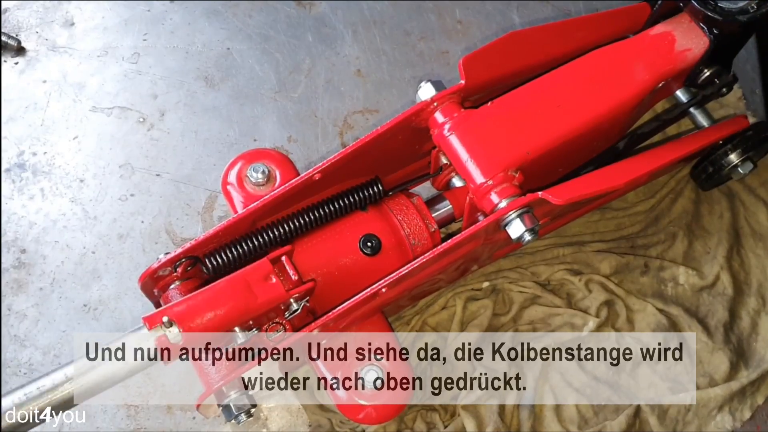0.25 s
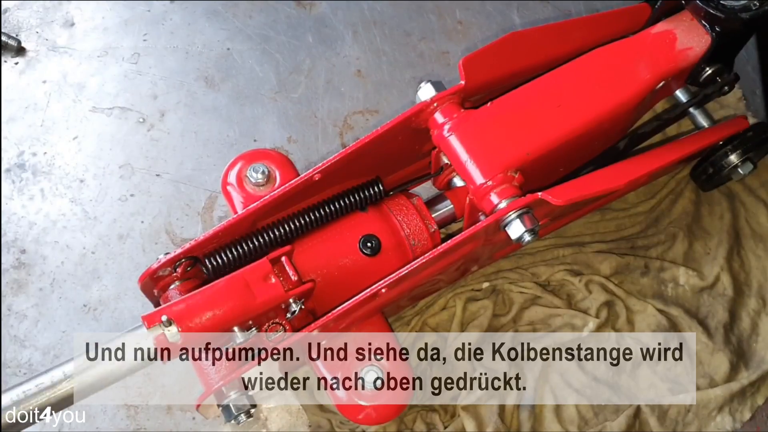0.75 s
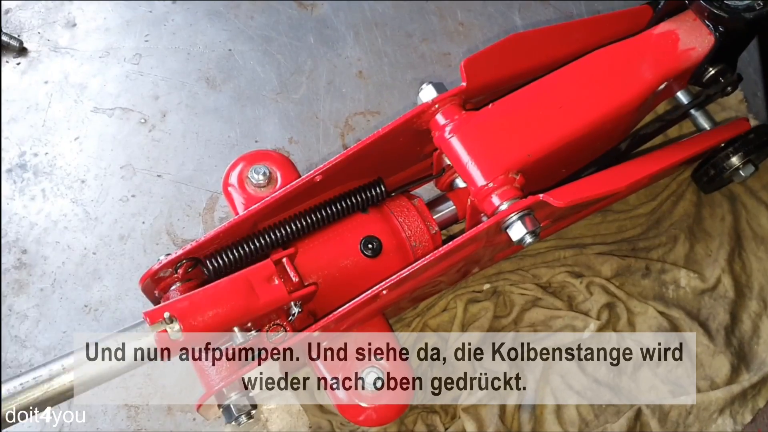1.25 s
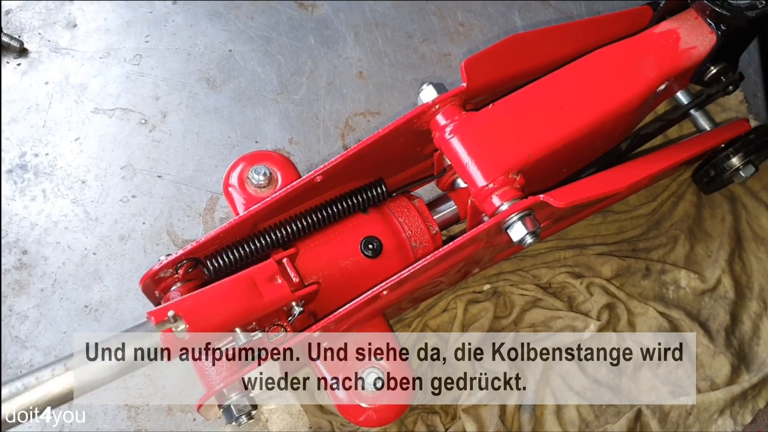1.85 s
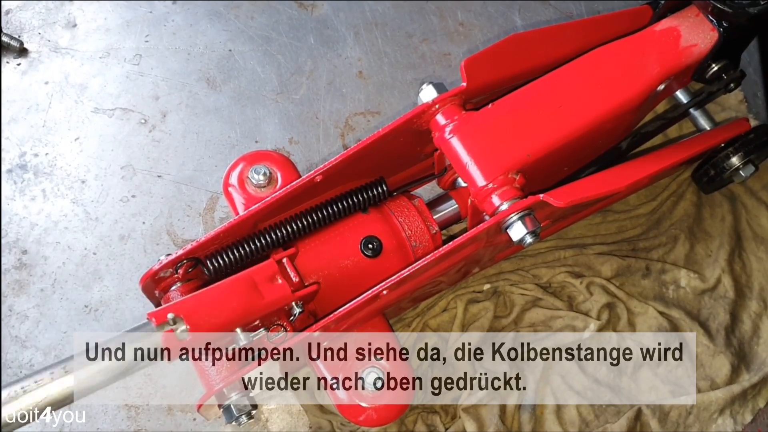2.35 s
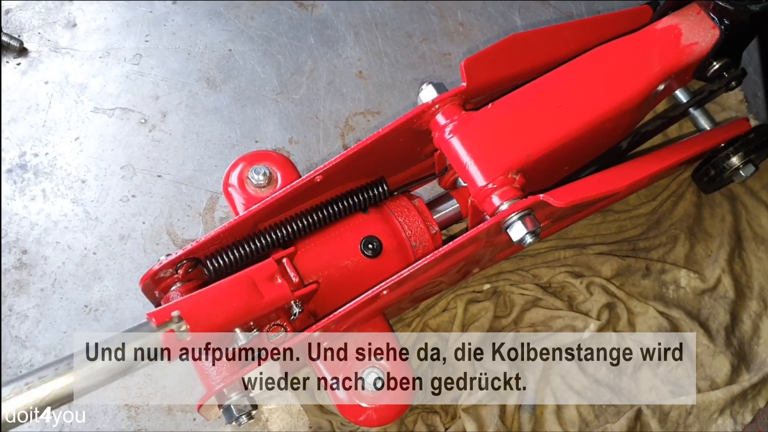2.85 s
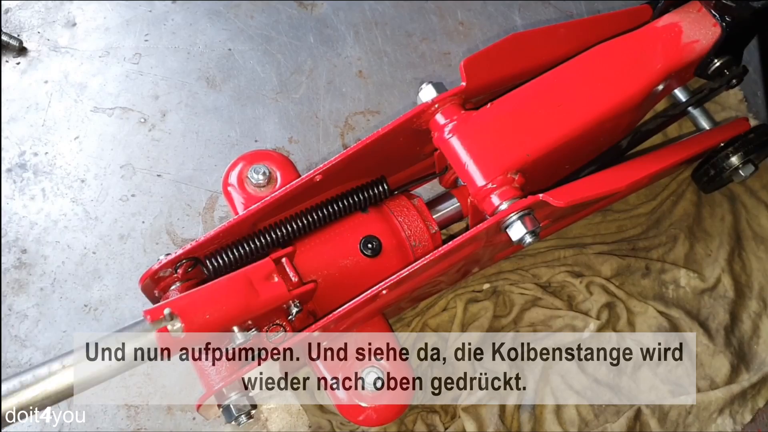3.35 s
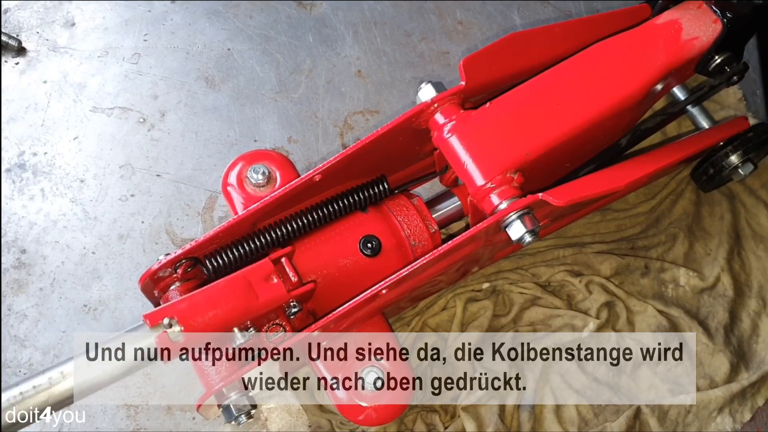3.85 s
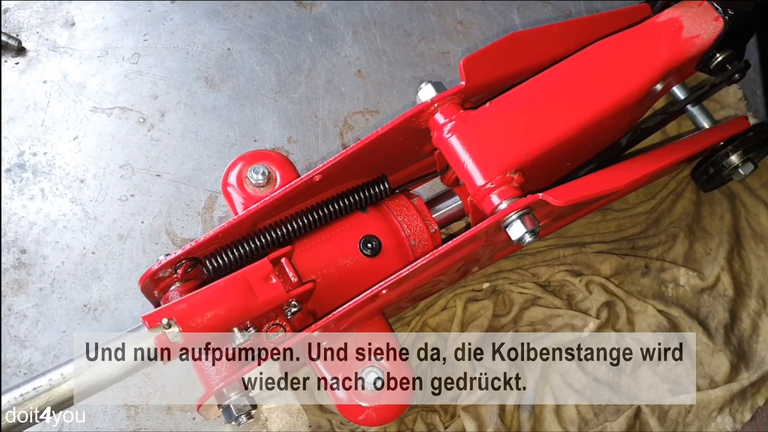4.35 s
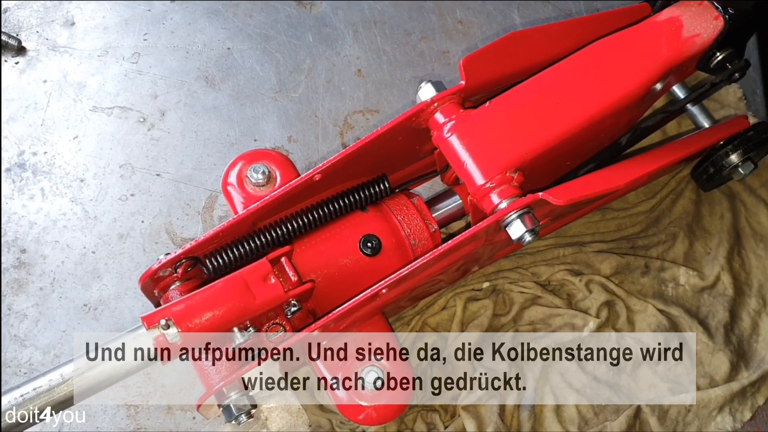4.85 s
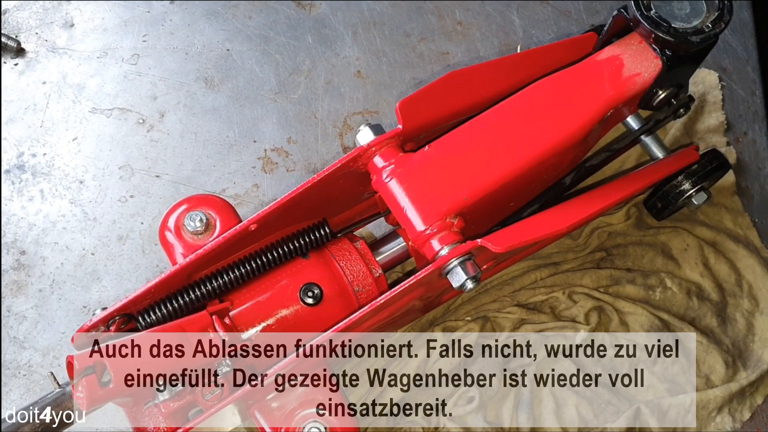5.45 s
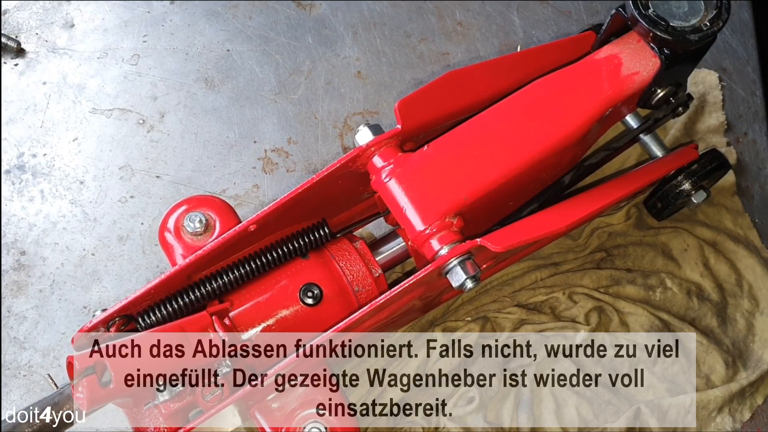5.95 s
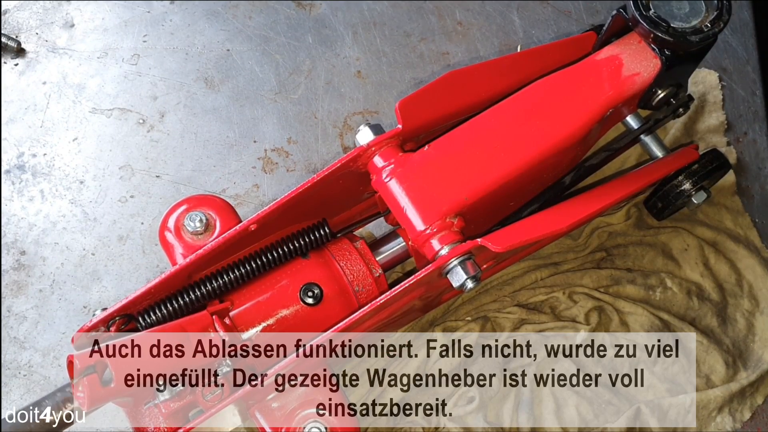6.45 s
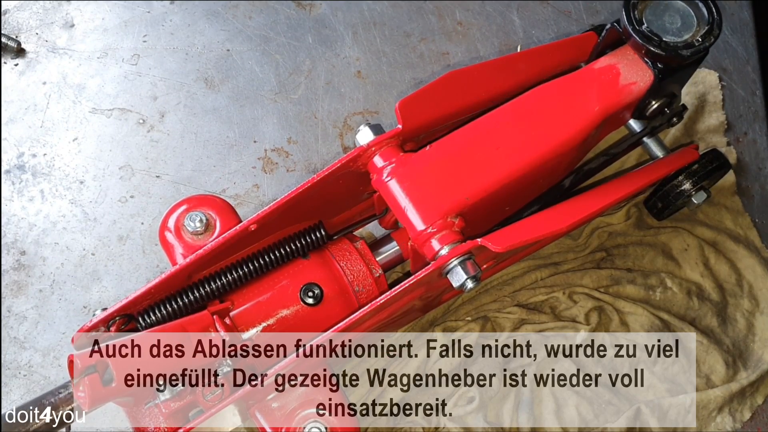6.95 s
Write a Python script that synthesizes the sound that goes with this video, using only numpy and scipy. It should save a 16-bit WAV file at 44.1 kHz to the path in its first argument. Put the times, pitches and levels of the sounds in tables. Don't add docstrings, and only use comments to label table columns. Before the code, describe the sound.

A hydraulic floor jack is pumped quickly by its handle, clanking and rattling sharply on a booming steel bench, then set down and quietly released.

```python
import sys
import numpy as np
from scipy import signal
from scipy.fft import rfft, irfft, next_fast_len
from scipy.io import wavfile
from scipy.ndimage import uniform_filter1d

SR = 44100
rng = np.random.default_rng(int(sys.argv[2]) if len(sys.argv) > 2 else 0)


def boost(x):
    u = np.asarray(x, float) / 20
    return 10 ** u


def dump_mix(stems):
    frames = np.atleast_2d(stems).T
    limited = np.clip(frames, -1, 1)
    pcm = np.round(limited * 32767).astype(np.int16)
    wavfile.write(sys.argv[1], SR, pcm)


N = 316623

# (pitch [Hz], level [dB per Hz])
AIR_COLOUR = [(25, -19.5), (100, -1.5), (280, -15), (569, -27.5), (6500, -31), (7600, -39), (11500, -33),
              (16000, -39)]
AIR_DB = -75
# (pitch [Hz], time to fade 60 dB [s])
SHOP_FADE = [(100, 0.69), (420, 0.14), (1100, 0.24), (2900, 0.24), (7700, 0.19), (15000, 0.22)]

# (pitch [Hz], wander [Hz])
BENCH_MODES = [(52, 3), (74, 5), (96, 4)]
# (pitch [Hz], width [Hz], level [dB])
RATTLE_MODES = [(159, 16, 5.5), (233, 41, -3.5), (267, 39, -3.5), (305, 24, -3.5)]
# (time [s], level [dB], hold [s] if it lasts)
HEAVES = [(0, -33.5), (0.266, -42), (.51, -32.5, 0.033), (0.67, -43), (1.03, -33, 0.028),
          (1.54, -44.5, .08), (2.01, -38), (2.5, -33), (3.0, -27.5, 0.027), (3.5, -40.5, 0.039),
          (3.9, -52, .2), (4.56, -47.5), (5.25, -62.5, 0.48), (5.9, -53.5, 0.24), (6.25, -62, 0.14)]
HEAVE_RISE, HEAVE_FALL = 360, 100
# (time [s], level [dB], hold [s] if it lasts)
JOLTS = [(0, -27.5, 0.023), (.11, -23.5), (0.279, -31.5), (.4, -32.5), (.51, -26.5, 0.068), (0.776, -24),
         (0.905, -38.5, .05), (1.029, -27, 0.019), (1.14, -30.5), (1.35, -34.5), (1.42, -36.5, 0.032),
         (1.53, -28, 0.017), (1.68, -32), (1.9, -35.5, .16), (2.17, -27, 0.017), (2.33, -40, 0.11),
         (2.5, -30.5, .03), (2.66, -30, 0.045), (2.83, -39.5, .12), (3.0, -24.5, 0.058), (3.14, -28),
         (3.36, -39.5, 0.095), (3.52, -29.5, .05), (3.65, -31.5, .04), (3.88, -35), (3.97, -38, .05),
         (4.22, -42, 0.061), (4.56, -43, 0.077)]
JOLT_RISE, JOLT_FALL = 730, 300
# (time [s], level [dB], hold [s] if it lasts)
NUDGES = [
    (4.7, -60.5, 0.16),
    (5.3, -61.5, 0.14),
    (5.925, -43, 0.02),
    (6.09, -43.5, .02),
    (6.2, -52.5, 0.046),
    (7.17, -62.5),
]
NUDGE_RISE, NUDGE_FALL = 600, 144

# (time [s], level [dB], hold [s] if it lasts)
RUBS = [(0, -46), (.6, -48.5), (1.0, -50.5), (2, -51.5, 0.21), (2.45, -56, .15), (3.05, -43), (3.597, -38),
        (3.95, -69, 0.51), (4.65, -76, 0.13), (5.03, -72), (5.19, -63), (5.3, -72, .15), (6.2, -77, 0.38),
        (7.18, -77)]
RUB_RISE, RUB_FALL, STILL_DB = 98, 120, -86.5
# (pitch [Hz], level [dB per Hz])
RUB_COLOUR = [(150, 2), (350, 0), (700, -11), (1400, -14), (4000, -15), (6500, -19.5), (8000, -29.5),
              (16000, -32.5)]

# (time [s], level [dB], pitch [Hz])
TICKS = [(.043, -50, 6200), (.435, -52, 12000), (.513, -44, 1400), (.56, -46, 2500), (2.618, -52, 9000),
         (3.012, -50, 7000), (3.123, -44, 5000), (.82, -50, 11000), (.866, -46, 13000), (1.052, -46, 11500),
         (1.313, -51, 5500), (1.476, -52, 11000), (1.815, -54, 5500), (1.962, -48, 10000),
         (2.011, -41, 5000), (2.131, -46, 5200), (2.305, -52, 5000), (2.553, -48, 11000),
         (2.94, -52, 10000), (2.978, -54, 9500), (3.035, -42, 5200), (3.328, -52, 5500), (3.367, -46, 5000),
         (3.373, -44, 9000), (4.022, -48.5, 5200), (5.345, -53, 4960), (6.36, -72, 2800),
         (6.545, -70, 1500), (6.548, -70, 3900)]

FRAME_HZ = [1210, 1350, 1633, 1758, 2800, 3204, 3820, 4730, 5310]
LIFT = [(0.3125, -33.5, 1490, -5.5, -14.5), (0.345, -30, 2500, -29.5, -4),
        (0.3577, -24.5, 3560, -10.5, -13.5), (0.8198, -29.5, 1800, -10, -10), (0.841, -27, 3140, -39, -3.5),
        (0.8658, -25.5, 1800, -10.5, -11), (1.3225, -39, 1770, -2.5, -27),
        (1.3453, -25.5, 3130, -15.5, -29), (1.8231, -40, 1810, -2.5, -22), (1.86, -26.5, 7850, -17.5, -14),
        (2.31, -33.5, 1210, -5, -21), (2.3317, -26.5, 1380, -24.5, -16.5), (2.8063, -35.5, 1830, -7, -25),
        (2.8232, -32, 3130, -10, -10.5), (3.2775, -49, 6360, -7.5, -15), (3.3348, -35.5, 1420, -6.5, -30),
        (3.853, -37.5, 1340, -4, -21)]
TOP = [(0.375, -33.5, 6700, -7, -2), (0.38, -19, 2600, -10, -8.5), (0.8923, -11, 3720, -18, -11),
       (1.3856, -24.5, 1360, -8, -7), (1.403, -17.5, 2880, -26, -10.5), (1.8793, -26.5, 2140, -10, -18),
       (1.897, -27.5, 6400, -3, 9.5), (1.9053, -17, 2840, -29, -15), (1.914, -22, 3000, -29, -24),
       (2.3627, -20.5, 3150, -26, -13.5), (2.3822, -21.5, 6600, -16, -13.5), (2.8703, -21, 1950, -16, -18),
       (2.883, -15.5, 3700, -15.5, -12.5), (3.3813, -18.5, 3350, -24.5, -15.5),
       (3.4058, -18, 3900, -24, -10.5), (3.4125, -18.5, 2200, -13, -15), (3.9181, -28.5, 2040, -9, -20),
       (3.9355, -15, 2750, -20, -14)]
TURN = [(0.4721, -34, 1210, -7.5, -22.5), (0.4982, -23, 2442, -2.5, -10), (0.9868, -26, 1700, -8, -9),
        (1.4597, -32.5, 1320, -9, -5), (1.4761, -31, 1640, -3.5, -27), (1.5155, -31, 1050, -1, -11.5),
        (1.9771, -27, 1210, -5.5, -32), (2.4509, -22.5, 1900, -15, -4.5), (2.471, -25.5, 1709, -6, -27),
        (2.9535, -30, 1208, -5, -21), (2.9996, -33.5, 1430, 2.5, -21.5), (3.472, -27, 1673, -3.5, -21.5),
        (3.5172, -22, 2400, -19, -2), (3.5205, -20, 5000, -14, -2), (4.01, -39, 2000, -4.5, -2),
        (4.0382, -36, 1204, 2.5, -23.5)]
PUSH = [(0.063, -34.5, 1030, -5.5, -14), (0.0831, -30, 1420, -8, -23), (0.529, -26, 3000, -6, -6),
        (0.5551, -30.5, 1210, -0.5, -16.5), (1.052, -30, 2400, -2, -7), (1.5544, -30.5, 4500, -23, -12.5),
        (2.0577, -29.5, 6600, -23, -9), (2.5503, -27.5, 5060, -23, -5.5),
        (2.587, -35.5, 1360, -24.5, -20.5), (3.022, -20.5, 2000, -3.5, -7.5), (3.0798, -28, 1540, -12, -30),
        (3.5588, -14.5, 1000, -20, -6.5), (3.612, -24, 1220, -5, -18.5), (4.1177, -32, 4850, -12, -3)]
BOTTOM = [(0.1274, -14.5, 1700, -10, -16), (0.2491, -23.5, 1880, -9, -31), (0.2522, -15.5, 5230, -13, -11),
          (.6058, -25.5, 1860, -12.5, -19.5), (.625, -19.5, 1450, -9.5, -12), (0.7499, -19, 1700, -6, -21),
          (0.7563, -10, 5300, -15, -8), (1.1163, -18, 1530, -11, -15.5), (1.1334, -20, 1500, -9, -11),
          (1.1425, -23, 2600, -20, -21), (1.6204, -26, 4180, -8, -6), (1.6398, -19, 1210, -8.5, -9.5),
          (2.1415, -13, 1900, -9, -9), (2.1447, -12.5, 5240, -20.5, -9.5), (2.6408, -8, 5200, -18, -2),
          (2.647, -7.5, 5000, -16.5, -10.5), (3.1076, -21, 2930, -17, -10.5), (3.1181, -25, 1430, 0, -16),
          (3.6517, -11.5, 1680, -17.5, -6), (4.1897, -19, 3000, -24, -7), (4.197, -10.5, 2900, -24, -8),
          (4.2103, -26.5, 1210, -8, -9)]
RELEASE = [
    (4.5401, -34, 1800, 0, -32),
    (5.345, -39.5, 2600, -20, -18),
    (5.7901, -64, 2130, 7, -20),
    (5.8768, -37, 3300, -33, -8),
    (6.0555, -60, 3370, -10, 0),
    (6.189, -63, 1430, 6.5, -26),
]
FIZZ_DB = (-4.5, -6.5, -5.5, -7.5, -11, -12)
# (time [s], top end change [dB])
SHRILL = [(.38, -5), (.498, -10), (1.86, 6), (1.905, -6), (2.332, 8), (2.363, 10), (2.87, 8), (3.108, 10),
          (3.559, 4), (3.652, -8), (3.918, 13), (4.19, 9), (4.197, 5)]

# (start [s], end [s], level [dB])
SLIDES = [
    (.33, 0.377, -57),
    (0.83, 0.868, -43),
    (1.331, 1.37, -50.5),
    (1.836, 1.93, -53.5),
    (2.317, 2.37, -51),
    (2.819, 2.862, -45.5),
    (3.336, 3.41, -56),
    (3.862, 3.92, -60.5),
]
# (pitch [Hz], width [Hz], level [dB])
PLUNGER_BANDS = [(1346, 70, -11), (2078, 150, -16), (3106, 90, 0), (4296, 80, -6), (5658, 90, -13),
                 (6740, 100, -12)]

# (pitch [Hz], level [dB], time to fade 60 dB [s])
HANDLE_MODES = [(9512, 0, .13), (10455, 0, .14), (11230, -4, .07), (12010, -8, .1), (12670, -8, .12),
                (14850, 0, .11)]
# (time [s], level [dB])
HANDLE_BLOWS = [(.347, -56), (.757, -56), (1.14, -71), (1.344, -71), (1.39, -68), (1.622, -61), (1.64, -58),
                (1.862, -65), (2.143, -64), (2.363, -60), (2.646, -48), (2.824, -66), (3.382, -60),
                (3.655, -58.5), (4.197, -60)]

# (start [s], end [s], level [dB])
SCUFFS = [
    (0.46, 0.587, -43),
    (2.428, 2.576, -47.5),
    (3.566, 3.64, -43),
    (5.783, 5.86, -66.5),
    (6.19, 6.348, -66),
    (6.601, 6.661, -76.5),
    (7.136, 7.194, -67.5),
]

# (time [s], pitch [Hz], level [dB], time
# to fade 60 dB [s])
RINGS = [(.7505, 549, -26, .15), (.7505, 598, -29, .12), (.7505, 781, -31, .08), (2.331, 5650, -48, .12),
         (2.364, 3500, -42, .08), (2.551, 4850, -41, .06), (2.587, 1360, -42, .1), (3.56, 980, -30, .12),
         (3.584, 980, -31, .09), (3.611, 318, -25, .1), (3.617, 711, -30, .09), (3.652, 5000, -21, .02),
         (3.936, 2756, -35, .08), (4.118, 4850, -46, .06), (4.118, 6750, -51, .06), (4.21, 1210, -33, .05)]
# (start [s], length [s], pitch [Hz], level [dB])
GROANS = [(.895, .05, 517, -43), (3.522, .03, 1660, -41), (3.558, 0.055, 747, -39), (3.56, .05, 330, -36),
          (4.545, 0.15, 190, -42), (4.55, .1, 1590, -63), (5.79, .07, 560, -62), (6.199, .12, 1300, -76),
          (6.47, .05, 450, -74), (6.599, .07, 450, -76.5), (6.43, .1, 6600, -84)]

# (time [s], pitch [Hz], level [dB])
WHISTLE_UP = [
    (3.2, 10400, -90),
    (3.25, 10900, -80),
    (3.31, 11500, -80),
    (3.37, 11300, -82),
]
# (time [s], pitch [Hz], level [dB])
WHISTLE_DOWN = [
    (3.728, 11790, -86),
    (3.746, 11690, -77),
    (3.8, 10365, -82),
    (3.815, 10200, -99),
    (3.82, 11800, -99),
    (3.832, 11375, -80),
    (3.86, 9900, -84),
]
# (time [s], pitch [Hz], level [dB])
WHISTLE_LAST = [
    (4.30, 11560, -99),
    (4.33, 11100, -78),
    (4.36, 11600, -78),
    (4.38, 12000, -88),
    (4.44, 11660, -96),
    (4.46, 10820, -85),
    (4.50, 10800, -84),
    (4.54, 10500, -86),
    (4.56, 10500, -96),
]
# (time [s], level [dB])
HISS = [(4.45, -95), (4.63, -78), (4.8, -95), (4.95, -97), (5.03, -80), (5.1, -90), (5.3, -73), (5.4, -81),
        (5.55, -97), (6.0, -95), (6.09, -82), (6.25, -92), (6.33, -80), (6.4, -90), (6.47, -80), (6.7, -87),
        (6.8, -100)]

# (time [s], level [dB], lower pitch [Hz], upper pitch [Hz], time to fade 60 dB [s])
CLACKS = [
    (4.5404, -45, 1700, 2500, .24),
    (5.3445, -59, 1730, 2700, .15),
    (5.8763, -43, 2620, 4350, .22),
]
# (pitch [Hz], level [dB], time to fade 60 dB [s])
VALVE_MODES = [(883, -1, .11), (1572, -8, .08), (1733, 0, .12), (2729, -7, .05)]
VALVE_S, VALVE_DB = 5.344, -51

# (pitch [Hz], level [dB])
LEFT_TREBLE = [(4000, 0), (9000, 2)]
LEFT_LEAD = 6
EDGE_HZ, PEAK_EDGE_HZ, PEAK_DB = 15800, 16450, -23
# (start [s], end [s], edge [Hz])
TOP_LOST = [(.258, .275, 12500), (.395, .41, 15000), (.483, .525, 13500), (.6, .622, 12500),
            (.765, .80, 15100), (.872, .897, 13600), (1.042, 1.062, 13300), (1.118, 1.131, 12600),
            (1.335, 1.36, 13000), (1.36, 1.38, 15000), (1.518, 1.526, 13200), (1.6, 1.617, 13000),
            (1.845, 1.864, 13000), (1.905, 1.916, 13200), (1.916, 1.96, 14900), (2.038, 2.057, 13300),
            (2.315, 2.345, 12900), (2.37, 2.45, 14000), (2.458, 2.497, 12600), (2.552, 2.572, 13800),
            (2.826, 2.865, 15000), (3.87, 3.9, 14800), (3.9, 3.935, 13300), (3.935, 3.958, 14500),
            (4.172, 4.188, 13500)]


def evened(x):
    return x / np.sqrt(np.mean(x ** 2) + 1e-20)


def read(points, hz):
    f, value = np.transpose(points)
    return np.interp(np.log(hz + 1), np.log(f + 1), value)


def curve(rows):
    s, *columns = np.transpose(rows)
    return [np.interp(np.arange(N) / SR, s, c) for c in columns]


def humps(rows, rise, fall):
    t = np.arange(0, N / SR + 1, .002)
    level = STILL_DB
    for s, db, *hold in rows:
        climb = rise * np.maximum(s - t, 0)
        sink = fall * np.maximum(t - s - abs(sum(hold)), 0)
        level = np.maximum(level, db - climb - sink)
    return np.interp(np.arange(N) / SR, t, level)


def add(mix, s, sound):
    part = mix[..., round(s * SR):][..., :sound.shape[-1]]
    part += sound[..., :part.shape[-1]]


def strokes(rows, taper):
    strength = np.zeros(N)
    for start, end, db in rows:
        add(strength, start, boost(db) * signal.windows.tukey(round((end - start) * SR), taper))
    return strength


def coloured(x, points):
    size = next_fast_len(x.shape[-1])
    gain = boost(read(points, np.fft.rfftfreq(size, 1 / SR)))
    return irfft(rfft(x, size) * gain, size)[..., :x.shape[-1]]


def resonate(x, hz, width):
    r = np.exp(-np.pi * width / SR)
    if np.ndim(hz) == 0:
        return 2 * signal.lfilter([1 - r], [1, -r * np.exp(2j * np.pi * hz / SR)], x).real
    turn = np.exp(2j * np.pi * np.cumsum(hz) / SR)
    return 2 * (turn * signal.lfilter([1 - r], [1, -r], x / turn)).real


def ring(modes, t, spread_db, luck):
    hz, db, t60 = np.transpose(modes)[:, :, None]
    share, phase = luck[:, :len(modes), None]
    fading = boost(db + spread_db * share - 60 * t / np.minimum(t60, .3))
    return (fading * np.sin(2 * np.pi * hz * t + phase)).sum(0)


def sides(left_db, right_db):
    return boost([[left_db], [right_db]])


def placed(x, pan_db, same):
    left = np.roll(x[0], -LEFT_LEAD)
    right = same * x[0] + np.sqrt(1 - same ** 2) * x[1]
    return np.array([left, right]) * sides(pan_db / 2, -pan_db / 2)


def room_air():
    noise = coloured(rng.standard_normal((2, N)), AIR_COLOUR)
    return boost(AIR_DB) * evened(placed(noise, .5, 0.17))


def bench():
    rock_db = humps(HEAVES, HEAVE_RISE, HEAVE_FALL)
    jolt_db = humps(JOLTS, JOLT_RISE, JOLT_FALL)
    nudge_db = humps(NUDGES, NUDGE_RISE, NUDGE_FALL)
    boom_db = np.maximum(jolt_db, nudge_db)
    shake_db = np.maximum(jolt_db, nudge_db - 6.5)
    out = np.zeros((2, N))
    for (hz, wander_hz), db in zip(BENCH_MODES, (rock_db, rock_db - 4.5, boom_db)):
        drift = uniform_filter1d(uniform_filter1d(rng.standard_normal((2, N)), 1800), 1800)
        drift = drift / drift.std()
        turns = np.cumsum(hz + wander_hz * drift, axis=1) / SR
        tone = np.sin(2 * np.pi * turns) * boost(0.88 * drift[::-1])
        out += boost(db) * evened(placed(tone, -0.57, 0.94))
    rattle = np.array([sum(boost(db) * resonate(resonate(n, hz, w), hz, 4 * w) for hz, w, db in RATTLE_MODES)
                       for n in rng.standard_normal((2, N))])
    return out + boost(1.062 * shake_db - 10.5) * evened(placed(rattle, 0.7, 1.0))


def rubbing():
    slips = evened(uniform_filter1d(rng.standard_normal(N), 200))
    flicker = boost(2.5 * slips + 2.2 * rng.exponential(1, N))
    grain = coloured(flicker * rng.standard_normal((2, N)), RUB_COLOUR)
    return boost(humps(RUBS, RUB_RISE, RUB_FALL) + 3) * evened(placed(grain, 9.1, 0.38))


def pin_ticks():
    out, t = np.zeros((2, N)), np.arange(400) / SR
    for s, db, hz in TICKS:
        tick = np.sin(2 * np.pi * hz * t) * t * hz * np.exp(-t * hz / 1.5)
        add(out, s, boost(db) * tick * sides(4.5, -1.5))
    return out


def shop(x):
    out = np.zeros((2, N))
    for k in range(3):
        taps = np.zeros((2, SR // 2))
        at = np.arange(180, SR // 2 - 20, 14) + rng.integers(0, 14, (2, 1561))
        np.put_along_axis(taps, at, rng.choice([-1., 1.], at.shape), 1)
        hz, t, z = signal.stft(taps, SR, nperseg=256)
        z[1, hz < 450] = z[0, hz < 450]
        fading = boost(-60 * t / read(SHOP_FADE, hz)[:, None])
        tail = signal.istft(z * fading, SR, nperseg=256)[1]
        turn = np.sqrt(2 / 3) * np.cos(2 * np.pi * (np.arange(N) / SR * 3 + k / 3))
        out += signal.oaconvolve(x * turn, tail / np.linalg.norm(tail[0]), axes=1)[:, :N]
    return out


def steel_knock(hz, bright_db, fizz_db, after, noise):
    rise = 1 - np.exp(-after / .0002)
    chatter = 4.5 * evened(uniform_filter1d(noise[2], size=50))
    clang = noise[:2] * rise * (boost(-60 * after / .006) + boost(-13 - 60 * after / .07 + chatter))
    frame = [(f, -25 - 7 * abs(np.log2(f / hz)), .05) for f in FRAME_HZ]
    clang = clang + ring(frame, after, 3, noise[2:]) * rise
    clang = clang + np.array([resonate(c, hz, .3 * hz) for c in clang])
    low_db = -7.0 * np.log2(hz / 1200)
    clang = coloured(clang, [(500, low_db - 25.5), (1000, low_db - 3.5), (1600, -8.5), (3200, -7.5),
                             (4000, bright_db), (5800, min(bright_db, fizz_db + 9.5)), (7200, fizz_db),
                             (12500, fizz_db - 5.0), (16000, fizz_db - 21.0)])
    crack = np.sin(2 * np.pi * hz * after) * boost(-60 * after / .007) * (1 - np.exp(-(after * hz) ** 2))
    return clang / abs(clang[0]).max() + boost(-7) * crack


def bench_thud(after, noise):
    swell = (1 - np.exp(-after / 0.0015)) * boost(-60 * after / 0.13)
    thud = coloured(noise * swell, [(100, -7.0), (200, 0.5), (500, -4.0), (900, -10.5), (1800, -43.0),
                                    (5000, -77)])
    return thud / abs(thud[0]).max()


def knocks():
    out, t = np.zeros((2, N)), np.arange(-128, 6000) / SR
    after = np.maximum(t, 0)
    chance = rng.standard_normal((4, N + len(t)))
    for rows, top_db in zip((LIFT, TOP, TURN, PUSH, BOTTOM, RELEASE), FIZZ_DB):
        for s, db, hz, thud_db, bright_db in rows:
            noise = chance[:, round(s * 1000) * SR // 1000:][:, :len(t)]
            fizz_db = bright_db + top_db + sum(extra for at, extra in SHRILL if abs(at - s) < .003)
            steel = steel_knock(hz, bright_db, fizz_db, after, noise)
            thud = bench_thud(after, noise[2:])
            add(out, s + t[0], boost(db) * placed(steel, 4.95 + 0.65 * noise[0, 0], 0.081))
            add(out, s + t[0], boost(db + thud_db) * placed(thud, 0.67, 0.93))
    return out


def plunger():
    song = evened(sum(boost(db) * evened(resonate(rng.standard_normal(N), hz, w)) for hz, w, db in PLUNGER_BANDS))
    return song * strokes(SLIDES, .3) * sides(2.5, -2.5)


def handle_rings():
    out, t = np.zeros((2, N)), np.arange(9000) / SR
    chance = rng.standard_normal((2, N))
    for s, db in HANDLE_BLOWS:
        luck = chance[:, round(s * 100) * 400:]
        tone = ring(HANDLE_MODES, t, 5, luck) * np.minimum(t / .001, 1)
        add(out, s, boost(db) * tone * sides(3.5, -3.5))
    return out


def scuffs():
    slips = boost(4.0 * np.minimum(rng.exponential(1, N), 4)) * (rng.random(N) < 1500 / SR)
    grit = coloured(slips * rng.standard_normal((2, N)), [(150, -24.5), (300, 7.5), (600, 0.0), (1300, -12.5),
                                                          (2200, -26), (5000, -46.5)])
    return strokes(SCUFFS, .6) * evened(placed(grit, 1.4, 0.93))


def part_rings():
    out, t = np.zeros((2, N)), np.arange(9000) / SR
    for s, hz, db, t60 in RINGS:
        pair = np.sin(2 * np.pi * hz * t) + .4 * np.sin(2 * np.pi * 1.025 * hz * t)
        add(out, s, boost(db - 60 * t / t60) * np.minimum(t * hz, 1) * pair * sides(2.5, -2.5))
    return out


def groans():
    out = np.zeros((2, N))
    for s, length, hz, db in GROANS:
        noise = rng.standard_normal((2, round(length * SR)))
        u = np.linspace(0, 1, noise.shape[1])
        width = 30 + .07 * hz
        tone = np.array([resonate(resonate(c, hz, width), hz, 2 * width) for c in noise])
        swell = np.minimum(u / .06, 1) * np.sqrt(1 - u)
        add(out, s, boost(db - 12 * u ** 2) * swell * evened(placed(tone, 2.5, 0.89)))
    return out


def oil():
    t, breathy, whistle = np.arange(N) / SR, rng.standard_normal(N), 0
    for rows, width in ((WHISTLE_UP, 500), (WHISTLE_DOWN, 45), (WHISTLE_LAST, 40)):
        hz, db = curve(rows)
        sounding = (t > rows[0][0]) * (t < rows[-1][0])
        whistle = whistle + boost(db) * sounding * evened(resonate(breathy, hz, width))
    hiss = evened(coloured(rng.standard_normal((2, N)), [(3000, -14), (6600, -5), (7500, -14), (10800, -7),
                                                         (13000, -10), (16000, -17.5)]))
    return whistle + boost(curve(HISS)[0] + 3.0) * hiss * (t > HISS[0][0]) * (t < HISS[-1][0])


def clacks():
    out, t = np.zeros((2, N)), np.arange(9000) / SR
    after = np.maximum(t - .01, 0)
    for s, db, low_hz, high_hz, t60 in CLACKS:
        fading = boost(3.0 - 60 * after / 0.013) + boost(-60 * after / t60)
        burst = rng.standard_normal((2, len(t))) * fading * np.minimum(after / .0005, 1)
        ping = sum(np.sin(2 * np.pi * hz * after) for hz in (low_hz, high_hz))
        ping = ping * boost(12 - 60 * after / .005) * np.minimum(after / .0002, 1)
        colour = [(0.14 * low_hz, -30), (.5 * low_hz, -9), (low_hz, 0), ((low_hz + high_hz) / 2, -1),
                  (high_hz, -2), (1.3 * high_hz, -7), (1.5 * high_hz, -24), (16000, -48)]
        add(out, s - t[441], boost(db + 8) * placed(coloured(burst, colour) + ping, 2.2, 0.52))
    return out


def release_screw():
    out, t = np.zeros((2, N)), np.arange(12000) / SR
    luck = rng.standard_normal((2, len(VALVE_MODES)))
    add(out, VALVE_S, boost(VALVE_DB) * ring(VALVE_MODES, t, 0, luck) * sides(1.5, -1.5))
    return out


def scene():
    jack = knocks() + release_screw() + plunger() + scuffs()
    jack = np.array([coloured(jack[0], LEFT_TREBLE), jack[1]])
    jack = jack + pin_ticks() + handle_rings() + part_rings() + groans() + clacks()
    rest = room_air() + bench() + rubbing() + oil()
    return jack + boost(-3.5) * shop(jack) + rest


def low_pass(x):
    return signal.sosfilt(signal.butter(12, 16470, fs=SR, output="sos"), x)


def record(dry):
    hz, t, z = signal.stft(dry, SR, nperseg=512)
    treble_db = 10 * np.log10((abs(z[:, hz > 1000]) ** 2).sum((0, 1)) + 1e-12)
    edge = np.where(treble_db > PEAK_DB, PEAK_EDGE_HZ, EDGE_HZ)
    for start, end, edge_hz in TOP_LOST:
        edge[(t > start) & (t < end)] = edge_hz
    mix = signal.istft(z * (hz[:, None] < edge), SR, nperseg=512)[1][:, :N]
    return low_pass(mix)


dry = scene()
out = record(dry)
dump_mix(out)
```